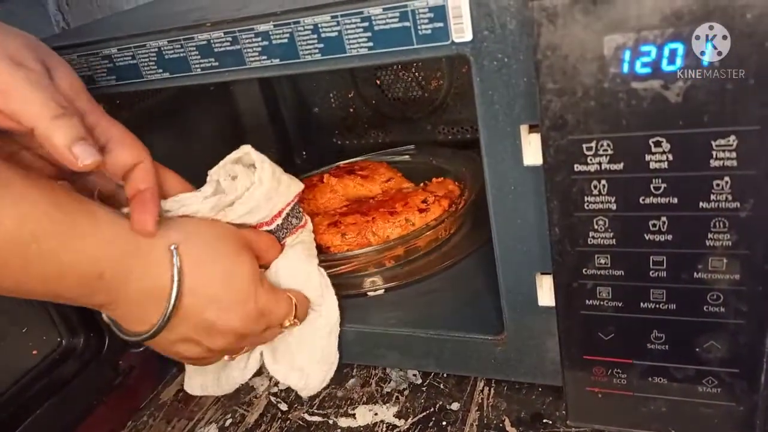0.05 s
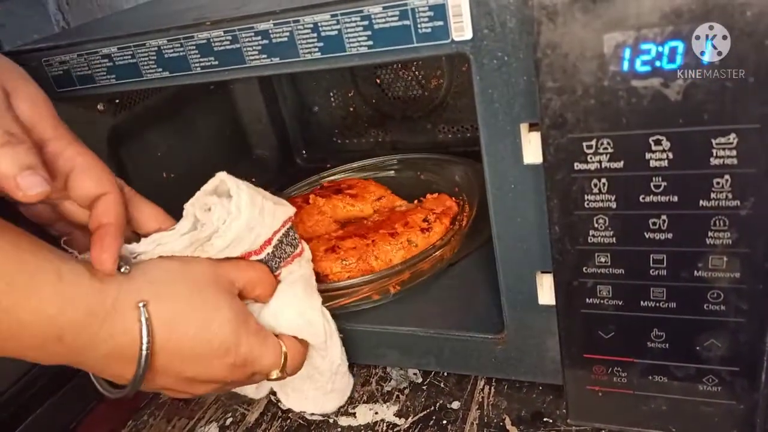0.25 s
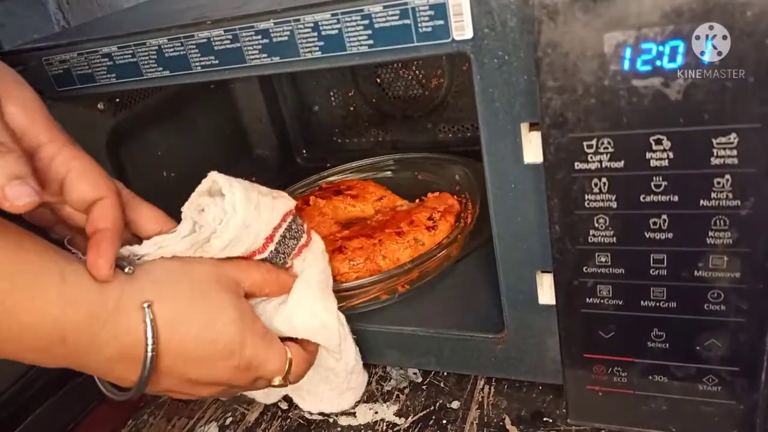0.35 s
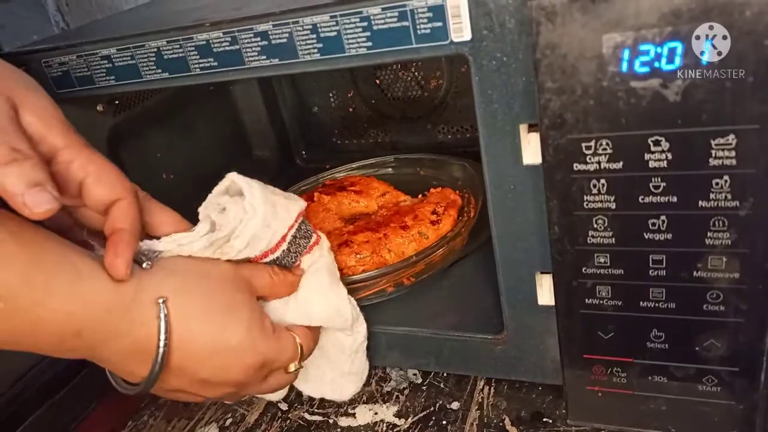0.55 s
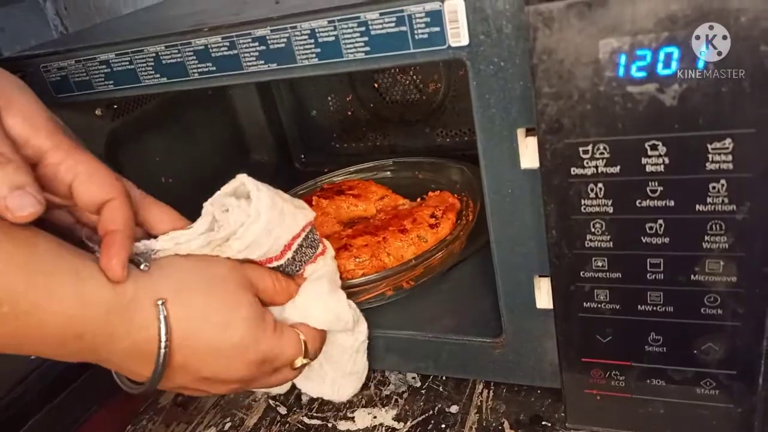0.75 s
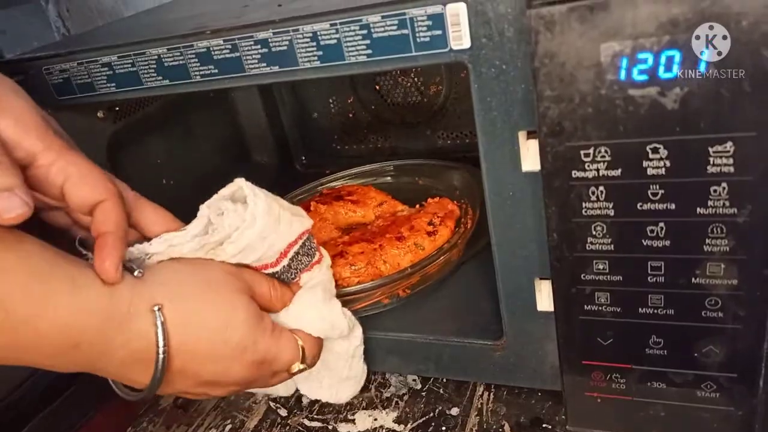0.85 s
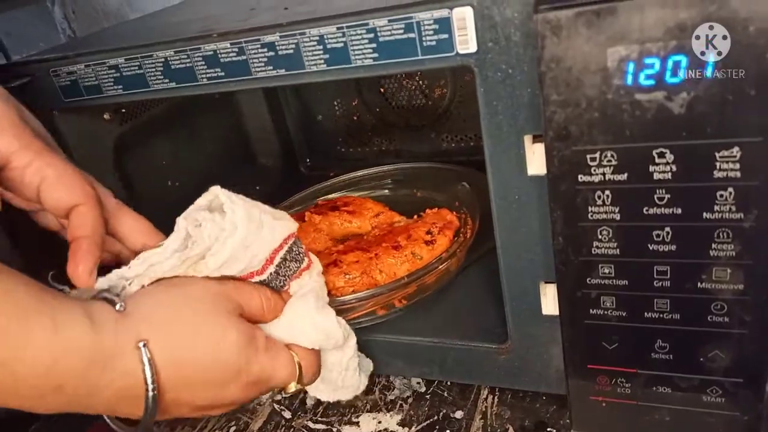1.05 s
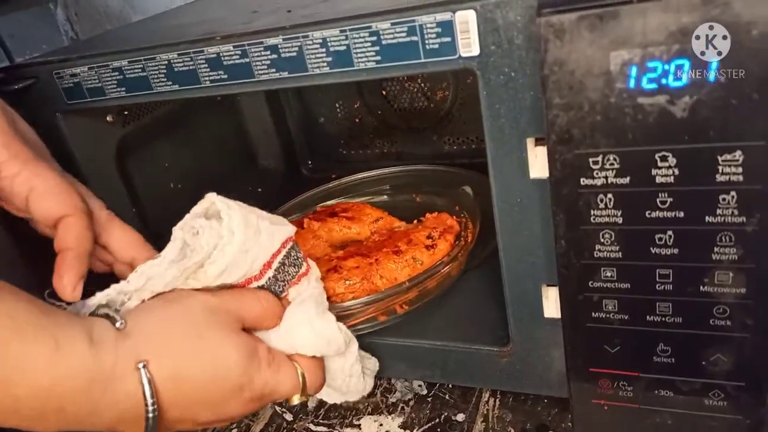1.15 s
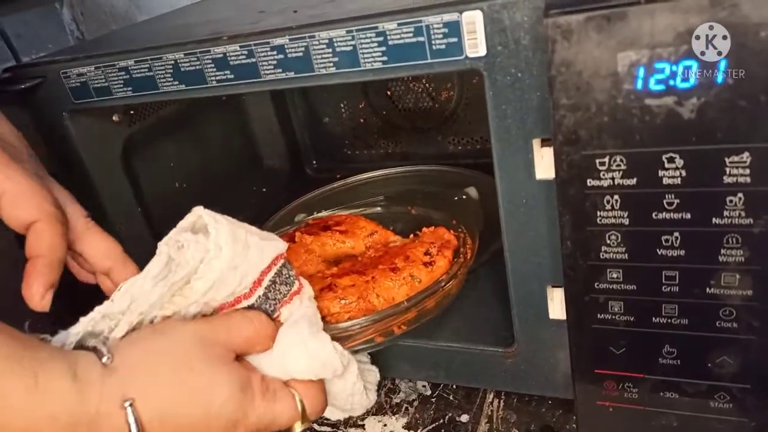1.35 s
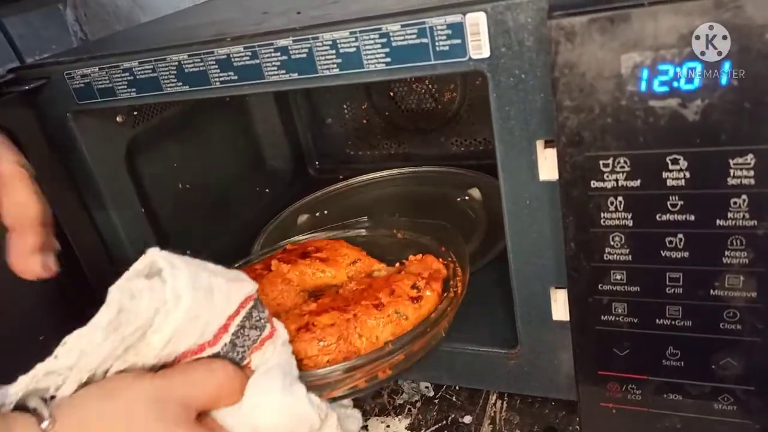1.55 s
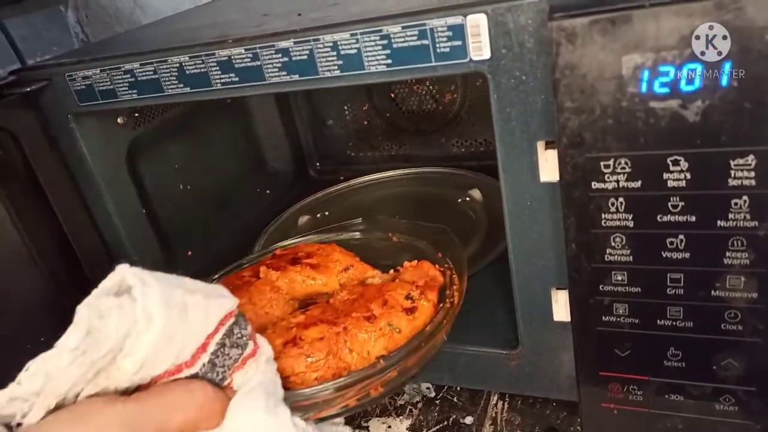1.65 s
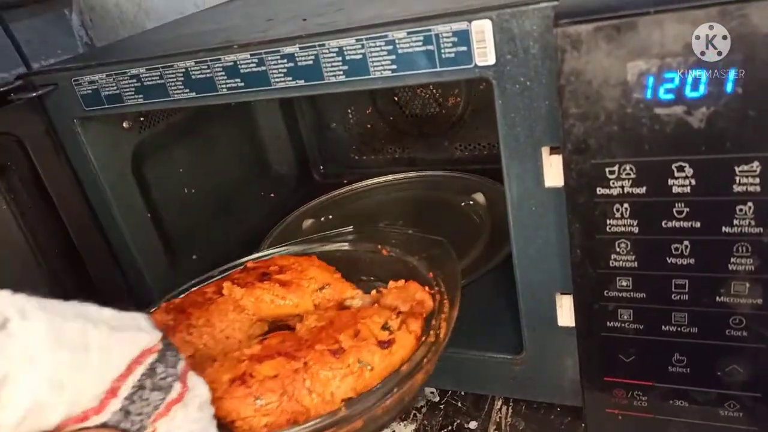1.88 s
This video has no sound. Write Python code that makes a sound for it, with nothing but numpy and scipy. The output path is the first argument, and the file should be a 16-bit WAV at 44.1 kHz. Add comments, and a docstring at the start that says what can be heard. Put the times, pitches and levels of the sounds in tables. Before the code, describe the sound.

A heavy glass dish scrapes briefly, hits with one loud, sharp clink over dull oven-floor knocks, then slides and taps lightly on a glass tray; close stereo microphone, quiet kitchen with steady soft room noise.

```python
"""A glass dish scrapes up to one sharp, booming clink, then slides and taps on a glass tray in a quiet kitchen.
It is dragged and lifted out of a microwave oven, close to a two-port microphone.
Contacts excite decaying modes and noise bursts; dense small slips ring the same kind of modes as scrape, rub
and rumble. Dull knocks boom the oven floor. A decaying reverb and steady noise make the kitchen."""
import sys
import numpy as np
from scipy import signal
from scipy.fft import rfft, irfft
from scipy.io import wavfile
from scipy.ndimage import uniform_filter1d

SR = 44100
rng = np.random.default_rng(int(sys.argv[2]) if len(sys.argv) > 2 else 0)


def inscribe(sig):
    """Save sig as 16-bit PCM at rate SR to the path in sys.argv[1].

    A 1-D sig is mono; a 2-D sig holds one channel per row.
    Samples are clipped to [-1, 1] before scaling.
    """
    pcm = np.round(np.clip(np.atleast_2d(sig).T, -1, 1) * 32767)
    wavfile.write(sys.argv[1], SR, pcm.astype(np.int16))


N = 83790

# likeness of left and right in the diffuse sound: (f/Hz, likeness 0-1)
LIKENESS = [(40, 0.7), (100, 0.96), (250, 1), (600, 0.62), (1600, 0.37), (5000, 0.057), (15000, 0.079)]
NEAR_LEAD_SAMPLES = 4  # left leads right


def amp(db):
    """Amplitude factor of a level in dB."""
    return 10 ** (np.asarray(db) / 20)


def evened(x):
    """Scale to unit RMS."""
    return x / np.sqrt(np.mean(x ** 2) + 1e-20)


def read(points, hz):
    """Interpolate a curve along log frequency."""
    f, value = np.transpose(points)
    return np.interp(np.log(hz + 1), np.log(f + 1), value)


def level_curve(points):
    """Interpolate (t/s, value) points linearly to every sample."""
    return np.interp(np.arange(N) / SR, *np.transpose(points))


def ring(hz, db, t60_s, rise_s=0.00031):
    """One mode: a sine with exponential decay and a soft start."""
    t = np.arange(SR // 2) / SR
    rise = 1 - np.exp(-t / rise_s)
    decay = amp(db - 60 * t / max(t60_s, .005))
    return rise * decay * np.sin(2 * np.pi * hz * t)


def blows(rows):
    """One impulse per contact (t/s, level/dB)."""
    out = np.zeros(N)
    for s, db in rows:
        out[round(s * SR)] = amp(db)
    return out


def pair(x, lead_samples):
    """Path difference between the ports: the right one hears it later."""
    return np.array([x[0], np.roll(x[1], lead_samples)])


def blend(left, other, hz):
    """Partly coherent port spectra: right shares with left by the likeness of each band."""
    same = np.clip(read(LIKENESS, hz), 0, 1)[:, None]
    return np.array([left, same * left + np.sqrt(1 - same ** 2) * other])


def cracks(rows, spectrum, db, t60_s, pan):
    """Each contact (t/s, level/dB, tilt/dB per octave above 1 kHz) throws a decaying burst of coloured noise."""
    size = 4096
    out, t, hz = np.zeros((2, N)), np.arange(size) / SR, np.fft.rfftfreq(size, 1 / SR)
    norm = np.sqrt(np.mean(amp(2 * read(spectrum, hz))))
    octaves = np.log2(np.maximum(hz, 1000) / 1000)
    balance = read(pan, hz) * [[.5], [-.5]]
    rise = np.minimum(t / 0.0014, 1)
    for (s, hit_db, tilt), z in zip(rows, rng.standard_normal((len(rows), 2, size))):
        colour = read(spectrum, hz) + tilt * octaves + balance
        noise = [z[0], 0.09 * z[0] + 1.17 * z[1]]  # nearly independent ports
        burst = irfft(rfft(noise) * amp(colour)) / norm
        start = round(s * SR)
        out[:, start:start + size] += burst * rise * amp(hit_db + db - 60 * t / t60_s)
    return out


def slips(modes, level):
    """Stick-slip friction: dense random grains each ring one mode, under a level curve."""
    grains_per_s, spread_db = 2400, 2
    grains = amp(spread_db * np.minimum(rng.exponential(1, N), 4))
    grains = grains * (rng.random(N) < grains_per_s / SR) * rng.choice([-1, 1], N)
    which = rng.integers(0, len(modes), N)
    body = sum(signal.oaconvolve(grains * (which == k), ring(*m))[:N] for k, m in enumerate(modes))
    return evened(body) * amp(level_curve(level))


def hush():
    """Steady room noise: coloured random spectra with faint drifting patches."""
    # noise colour: (f/Hz, relative level/dB per Hz)
    colour = [(25, -34), (50, -14), (85, 3), (195, -8), (250, -7.5), (400, -4.5), (560, -17.5), (930, -10),
              (1450, -18.5), (1850, -20), (2400, -25), (4500, -26.5), (5300, -37.5), (6570, -25),
              (8600, -33), (11600, -44.5), (13500, -41), (15500, -40.5)]
    level_db, lead_samples, patch_db = -45.5, 19, 0.42
    frames, hz = N // 256 + 5, np.fft.rfftfreq(1024, 1 / SR)
    a, b, c, d, patches = rng.standard_normal((frames, 513, 5)).T
    for axis in (0, 1):
        patches = uniform_filter1d(patches, size=10, axis=axis)
    z = blend(a + 1j * b, c + 1j * d, hz)
    z *= amp(read(colour, hz)[:, None] + patch_db * evened(patches))
    noise = signal.istft(z, nperseg=1024, noverlap=768)[1][:, :N]
    return pair(amp(level_db) * evened(noise), lead_samples)


def drag():
    """Friction rumbles the oven body modes; dull knocks flex its floor panel, which booms."""
    # oven body modes: (f/Hz, level/dB, t60/s)
    oven = [(214.8, -7, 0.23), (257, -3, 0.13), (321.6, -5.5, 0.083), (460.7, -6.5, 0.14),
            (489.4, -8, 0.11), (560, -1.5, 0.056), (629, -3, 0.076), (787, -4.5, 0.049)]
    # weight of the dish dragging on the oven: (t/s, level/dB)
    drag_level = [(0, -32.5), (0.038, -44.5), (.08, -52.5), (.22, -46.5), (0.279, -36.5), (0.338, -30),
                  (0.429, -49), (0.602, -42.5), (.73, -53), (.98, -54), (1.07, -43), (1.16, -54.5),
                  (1.21, -39), (1.3, -50.5), (1.47, -46), (1.62, -55.5), (1.9, -54)]
    # knocks on the floor panel: (t/s, level/dB)
    knocks = [(.006, -26.5), (.026, -41), (.24, -23.5), (.259, -27), (.292, -22), (.312, -25), (.345, -23),
              (1.066, -30)]
    panel_hz, panel_t60_s, panel_rise_s = 254.5, 0.072, 0.0021
    panel = ring(panel_hz, 0, panel_t60_s, panel_rise_s)
    boom = signal.fftconvolve(blows(knocks), panel)[:N]
    return pair((slips(oven, drag_level) + boom) * amp([[-.7], [.7]]), NEAR_LEAD_SAMPLES)


def scrape():
    """Slips and short catches ring the resonances of the dish base."""
    # dish base resonances: (f/Hz, level/dB, t60/s)
    base = [(673, -4, 0.091), (1130, -7.5, 0.071), (1490, -7.5, .035), (1633, -13, 0.048),
            (2030, -16.5, 0.047), (2550, -14, 0.028), (3470, -12, 0.018), (4470, -22, 0.029)]
    # scrape level: (t/s, level/dB)
    scrape_level = [(.1, -65), (.15, -49), (.185, -37), (0.196, -48), (.21, -38.5), (0.235, -38),
                    (0.243, -26), (0.27, -36.5), (.3, -71.5)]
    # catches: (t/s, level/dB, tilt/dB per octave about 1 kHz)
    catches = [(.153, -47, -27.5), (.172, -49, -5), (0.2025, -28, -5), (0.218, -31, -1), (0.236, -33, 13),
               (0.2425, -37, 5)]
    catch_rise_s = 0.0014
    out = slips(base, scrape_level)
    for hz, db, t60_s in base:
        octaves = np.log2(hz / 1000)
        hits = blows([(s, hit_db + tilt * octaves) for s, hit_db, tilt in catches])
        out += signal.oaconvolve(hits, ring(hz, db, t60_s, catch_rise_s))[:N]
    return pair(out * amp([[-1.2], [1.2]]), NEAR_LEAD_SAMPLES)


def clink():
    """The dish strikes and chatters: noise bursts plus modes that reach the ports unevenly."""
    # dish modes: (f/Hz, level/dB, t60/s, left-right/dB)
    dish = [(584.3, -11, 0.13, 0), (792, -13, 0.15, -1), (1027, -20.5, 0.17, -13),
            (1181, -11.5, 0.063, -1.5), (1384, -42, 0.17, -12), (1678, -19.5, 0.43, -10),
            (1830, -0.5, 0.011, -7.5), (2295, -26, 0.033, -19), (2593, -18, 0.29, -7),
            (2770, -15.5, 0.032, 3.5), (3570, -24, .08, 8), (3494, -18.5, 0.051, -20),
            (4170, -22, 0.086, -8.5), (4643, -23.5, 0.081, 23), (5320, -29, .1, -19), (6440, -45, 0.27, -5),
            (6270, -10.5, 0.038, 8), (7670, -30, 0.032, 1), (8100, -13.5, 0.05, 3),
            (12080, -35.5, 0.042, -3), (13650, -38, 0.083, 0)]
    # contacts: (t/s, level/dB, tilt/dB per octave above 1 kHz)
    contacts = [(.2742, -12.5, 1.25), (0.2764, -14, 1), (0.2786, -9.5, 1.07), (.282, -28, 2),
                (.286, -37, -12), (.292, -15.5, -0.5), (.306, -16, -40), (.32, -24.5, -6.5),
                (.331, -30, -24), (.345, -53, -11), (0.364, -43, -2), (.39, -34.5, -1.5)]
    # burst colour: (f/Hz, relative level/dB per Hz)
    spectrum = [(200, -36), (500, -5.5), (1200, 0), (1840, 4.5), (2900, -8.5), (3450, 0.5), (5100, -16),
                (6300, -6), (8400, -8), (11600, -89), (15500, -72)]
    # burst balance: (f/Hz, left-right/dB)
    balance = [(500, 33.5), (1200, -0.5), (2200, 5), (3500, 10.5), (6000, -10), (8300, 8), (12000, -9)]
    # places of a mode's three close partials (multiples of the split share)
    trio = [-0.74, 0.14, 0.74]
    crack_db, crack_t60_s, split_share = -5, 0.047, 0.0138
    out = cracks(contacts, spectrum, crack_db, crack_t60_s, balance)
    for k, (hz, db, t60_s, pan_db) in enumerate(dish):
        partials = sum(ring(hz * (1 + split_share * place), db - 7.5, t60_s) for place in trio)
        mode = (-1) ** k * partials  # signs alternate along the table
        octaves = np.log2(max(hz / 1000, 1))
        hits = blows([(s, hit_db + tilt * octaves) for s, hit_db, tilt in contacts])
        out += signal.oaconvolve(hits, mode)[:N] * amp([[pan_db / 2], [-pan_db / 2]])
    return pair(out, NEAR_LEAD_SAMPLES)


def taps():
    """Taps and rubbing on the tray: the spot struck weights the modes, close twins beat."""
    # tray modes by spot struck: (f/Hz, t60/s, edge/dB, middle/dB, rim/dB, flat/dB)
    tray = [(499.6, 0.22, -20.5, -16.5, -15, -11.5), (613.8, 0.38, -18, -16, -17, -17.5),
            (861.1, 0.25, -9, -28, -39, -33), (883.5, 0.1, -6.5, -24, -34, -22.5),
            (941, 0.08, -29, -30, -29, -10), (1132, 0.097, -14.5, -11.5, -16, -16),
            (1225, 0.045, -14.5, 4, -6, -13), (1520, 0.02, -36, -14, 0, -0.5),
            (1762, 0.059, -0.5, -5.5, -3.5, -9), (1782, 0.15, -15, -31, -14, -26),
            (1945, 0.11, -18.5, -4.5, -26, -17.5), (2065, 0.058, -10, -16, -39, -11),
            (2506, 0.081, -12.5, -21.5, -37, -40), (3130, 0.11, -23, -24.5, -39, -26),
            (3380, 0.045, -21, -27, -47, -25.5), (3667, 0.054, -46, -26.5, -15.5, -20),
            (4610, 0.055, -25.5, -29, -28, -43), (5307, 0.049, -27, -26, -43.5, -29),
            (6350, 0.21, -28, -38, -42, -42), (7500, 0.13, -25, -50, -47, -48)]
    # order of the tray's spot columns: (spot)
    spots = ["edge", "middle", "rim", "flat"]
    # taps: (t/s, level/dB, spot, main mode f/Hz as the dish sits)
    tap_rows = [(1, -41, "flat", 1815), (1.021, -35, "flat", 1810), (1.043, -47, "rim", 2030),
                (1.055, -38, "rim", 1730), (1.074, -35.5, "rim", 1846), (1.081, -37, "rim", 1833),
                (1.097, -33.5, "flat", 1720), (1.111, -39, "flat", 1870), (1.182, -42.5, "flat", 1766),
                (1.198, -34, "flat", 1730), (1.232, -35, "flat", 1603), (1.246, -28.5, "rim", 1755),
                (1.251, -33.5, "rim", 1788), (1.303, -25.5, "middle", 1765), (1.309, -34.5, "middle", 1757),
                (1.4703, -21, "edge", 1768), (1.4745, -21.5, "edge", 1761), (1.493, -40, "middle", 1690),
                (1.502, -35, "rim", 1780)]
    # burst colour: (f/Hz, relative level/dB per Hz)
    spectrum = [(300, -23.5), (650, -10), (900, -3), (1450, 1), (1900, -4.5), (2700, -24), (3300, -23),
                (8600, -45), (12000, -55)]
    # dish sliding on the tray: (t/s, level/dB)
    rub_level = [(.88, -59.5), (.96, -54.5), (1.02, -53), (1.08, -42), (1.12, -51), (1.16, -63),
                 (1.199, -47), (1.26, -60), (1.3, -60.5)]
    # balance: (t/s, left-right/dB)
    balance = [(1.0, -4), (1.25, -5), (1.47, -5.5)]
    # edges of alternating bands, fixed or moving with how the dish sits: (f/Hz)
    seat_hz = (1300, 2300, 3400, 4000)
    crack_db, crack_t60_s, rise_s, lead_samples = -4.5, 0.037, 0.00093, 2
    main_hz = 1765  # main mode with the dish at rest
    twin_ratio = 1.03  # modes closer than this are twins and share a sign
    rub_t60_share = 0.39  # the resting dish damps the tray

    contacts = [(s, db, 0) for s, db, spot, pitch_hz in tap_rows]
    out = cracks(contacts, spectrum, crack_db, crack_t60_s, [(1, 0), (2, 0.015)])
    mode_hz = np.array([m[0] for m in tray])
    signs = np.cumprod(np.where(mode_hz / np.roll(mode_hz, 1) > twin_ratio, -1, 1))
    moves = np.searchsorted(seat_hz, mode_hz) % 2
    for s, db, spot, pitch_hz in tap_rows:
        column = 2 + spots.index(spot)
        tap = np.zeros(SR // 2)
        for sign, move, m in zip(signs, moves, tray):
            hz = m[0] * (pitch_hz / main_hz) ** move
            tap += sign * ring(hz, db + m[column], m[1], rise_s)
        start = round(s * SR)
        out[:, start:start + len(tap)] += tap[:N - start]
    out += slips([(m[0], m[-1], rub_t60_share * m[1]) for m in tray], rub_level)
    return pair(out * amp(level_curve(balance) * [[.5], [-.5]]), lead_samples)


def kitchen(x):
    """Reverb: sparse impulses of random sign, each band decaying at its own rate."""
    # room decay: (f/Hz, t60/s)
    room_t60 = [(150, 0.53), (500, 0.46), (1500, 0.27), (4000, 0.33), (8000, 0.22), (13000, 0.45)]
    tail = np.zeros((2, SR // 2))
    slots = np.arange(200, SR // 2 - 20, 20)
    at = slots + rng.integers(0, 20, (2, len(slots)))
    np.put_along_axis(tail, at, rng.choice([-1., 1.], at.shape), 1)
    hz, t, z = signal.stft(tail, SR, nperseg=256)
    decay = amp(-60 * t / read(room_t60, hz)[:, None])
    tail = signal.istft(blend(z[0], z[1], hz) * decay, SR, nperseg=256)[1]
    return signal.fftconvolve(x, tail / np.linalg.norm(tail[0]), axes=1)[:, :N]


def scene():
    """Sum the direct sources, their reverb and the room noise."""
    near_room_db, tap_room_db = -6.5, -7.5
    near = drag() + scrape() + clink()
    tray = taps()
    room = kitchen(amp(near_room_db) * near + amp(tap_room_db) * tray)
    return near + tray + room + hush()


def record(dry):
    """Input stage rounds off peaks; then the microphone's treble dip, low cut and band limit."""
    # microphone treble dip: (f/Hz, gain/dB)
    notch = [(8500, -1), (9000, -24.5), (10000, -10.5), (11200, -18.5), (11600, 1)]
    ceiling, low_cut_hz, edge_hz = .92, 106, 15450
    rounded = ceiling * np.tanh(dry / ceiling)
    hz = np.fft.rfftfreq(512, 1 / SR)
    dip = np.roll(irfft(amp(read(notch, hz))), 256) * np.hanning(512)
    dipped = signal.oaconvolve(rounded, dip[None], "same")
    low_cut = signal.butter(3, low_cut_hz, "high", fs=SR, output="sos")
    heard = signal.sosfilt(low_cut, dipped)
    band_limit = signal.firwin(511, edge_hz, window=("kaiser", 9), fs=SR)
    return signal.oaconvolve(heard, band_limit[None], "same")


dry = scene()
out = record(dry)
inscribe(out)
```